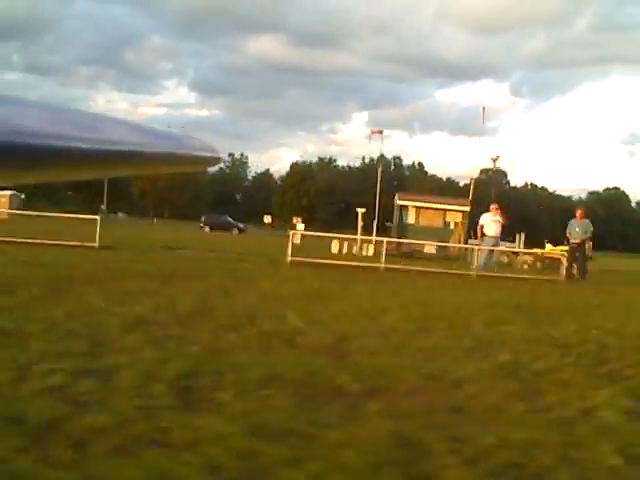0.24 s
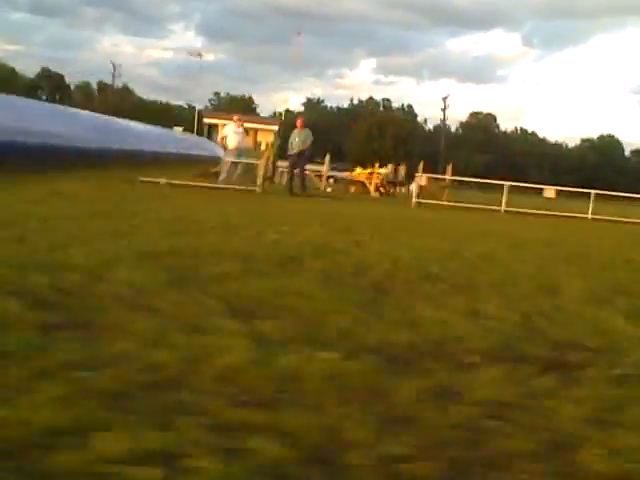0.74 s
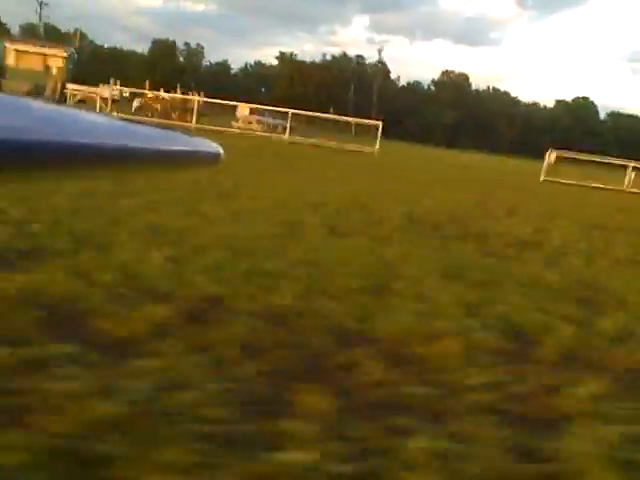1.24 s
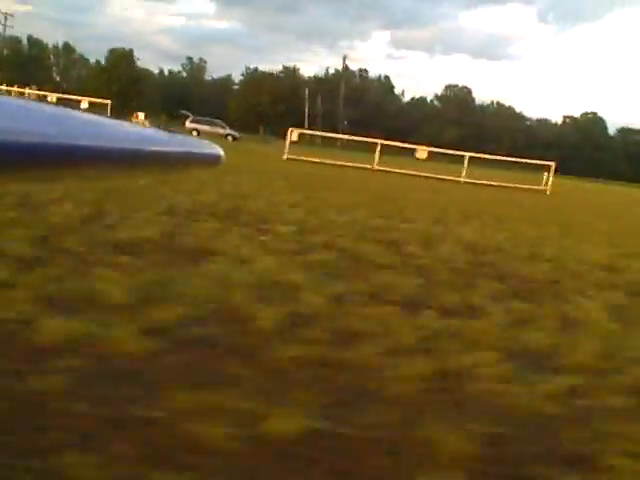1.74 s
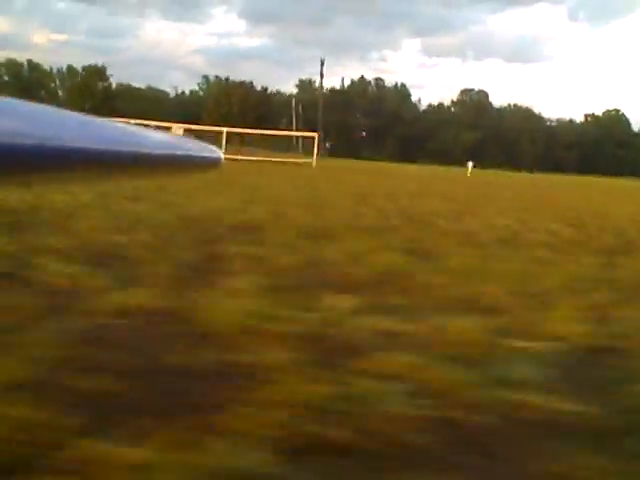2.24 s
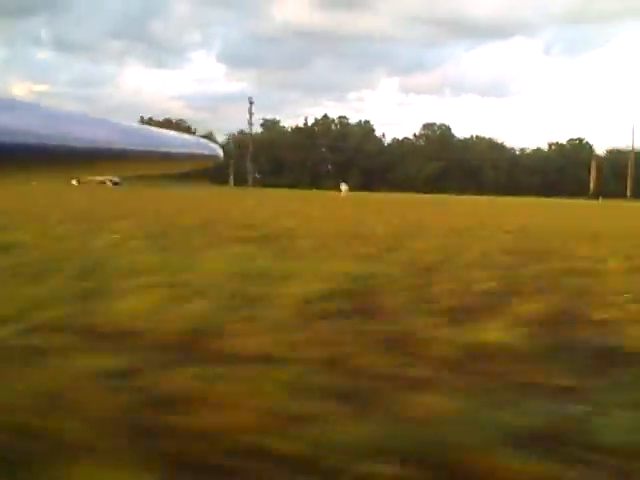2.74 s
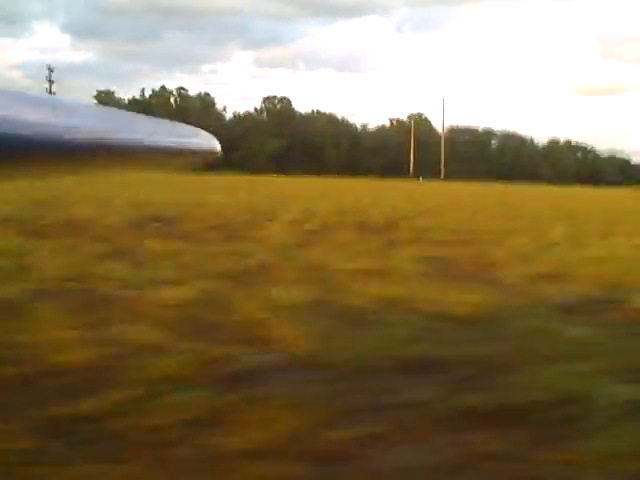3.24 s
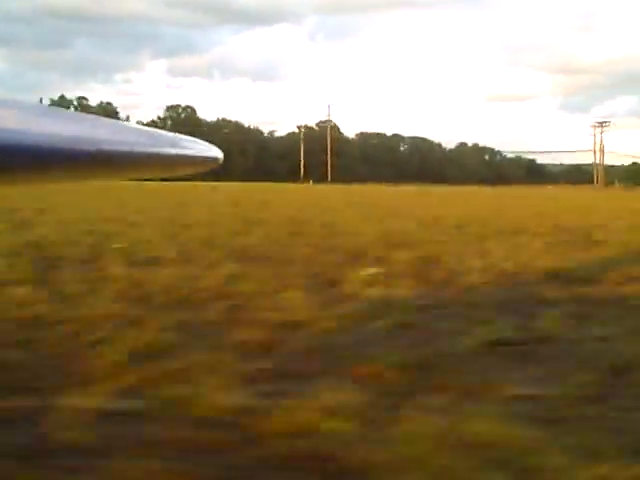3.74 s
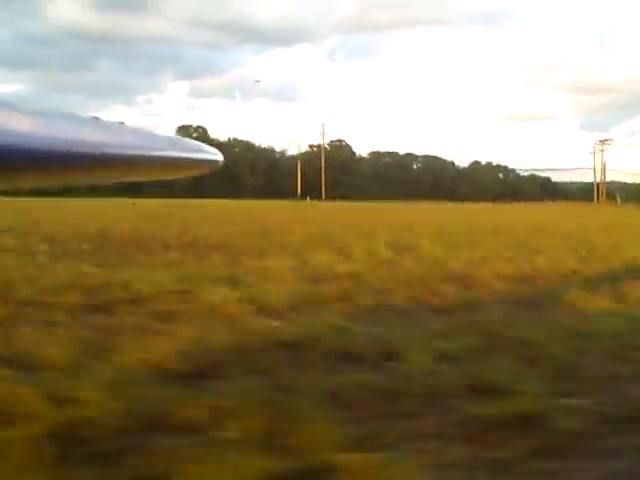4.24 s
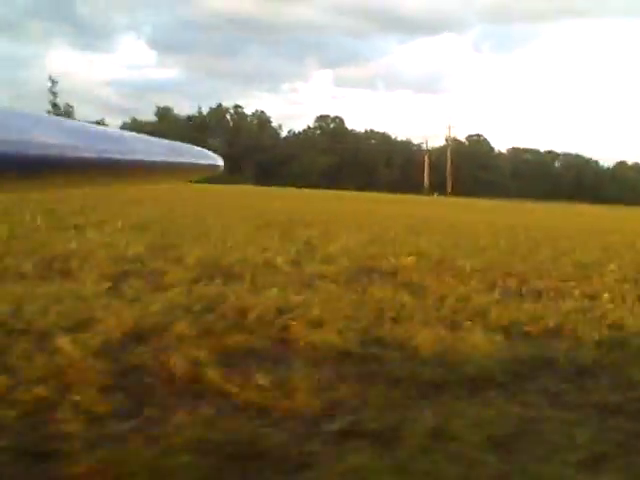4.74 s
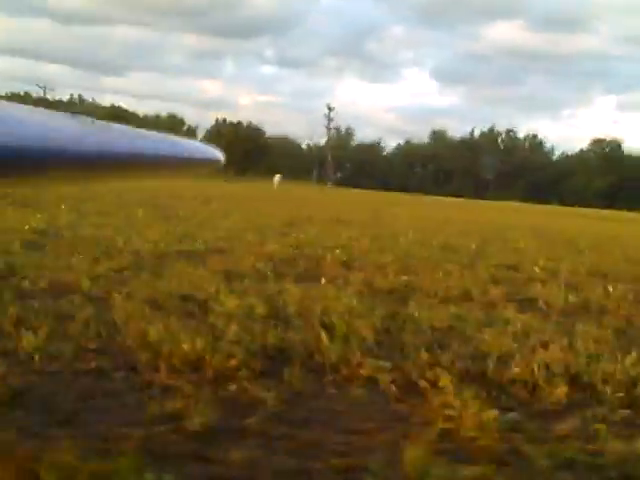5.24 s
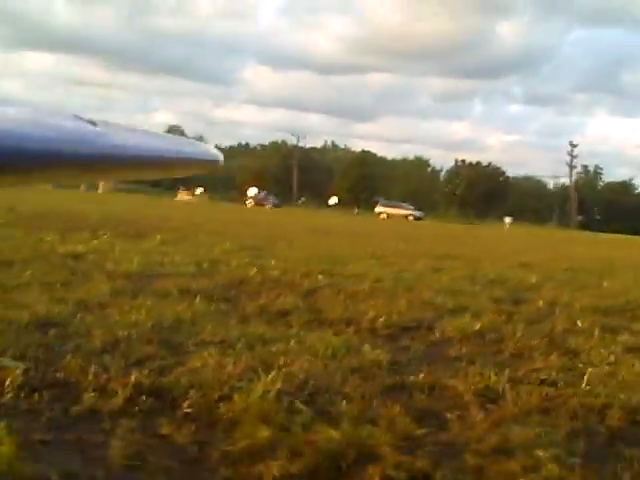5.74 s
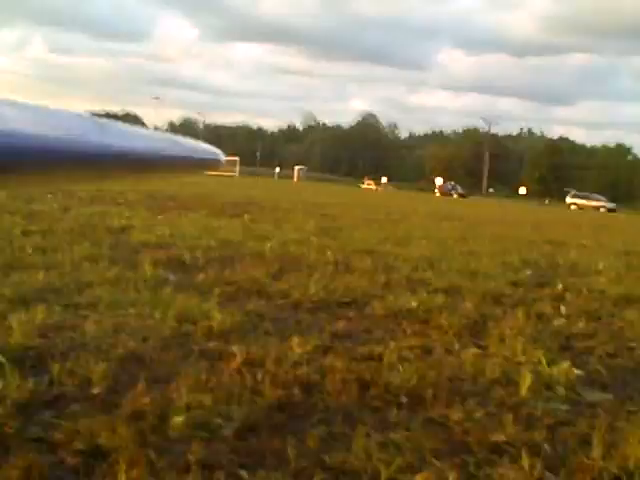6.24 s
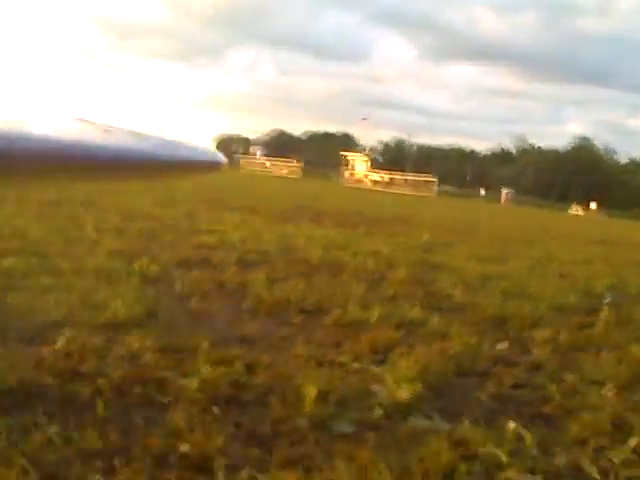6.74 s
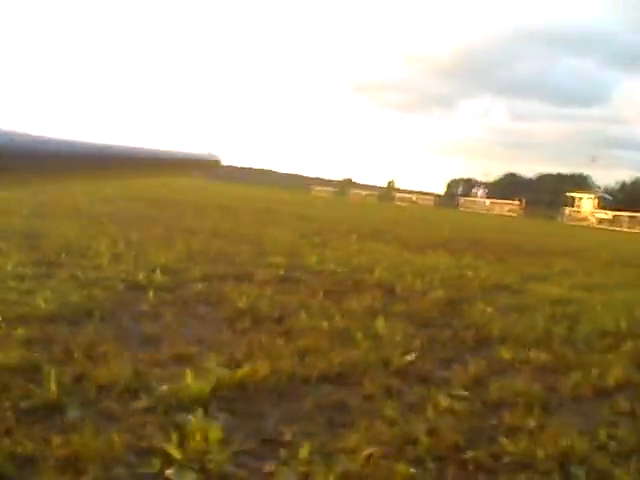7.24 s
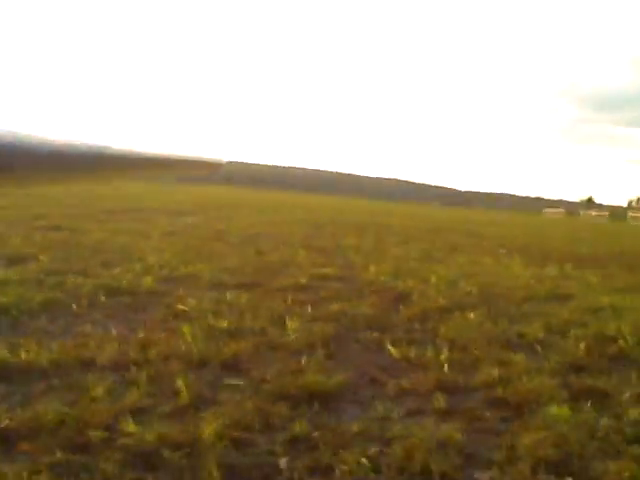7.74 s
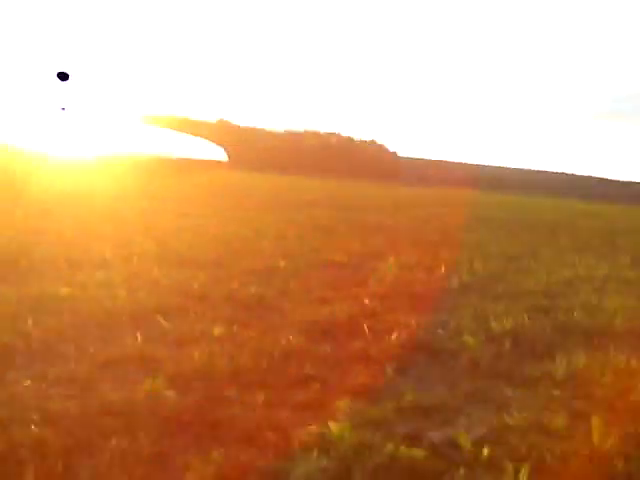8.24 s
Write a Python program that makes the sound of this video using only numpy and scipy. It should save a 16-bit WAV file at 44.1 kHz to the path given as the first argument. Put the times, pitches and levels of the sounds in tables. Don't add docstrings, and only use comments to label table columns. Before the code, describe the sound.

Heard from a tiny recorder strapped to a model plane, a motor idles with rapid metallic ticking and panel rattle while air buffets, slaps and hisses at the microphone. The idle sags and quietens slightly, then the throttle opens: a heavy propeller drone surges, climbs in pitch and lopes over bumps, with brief panel buzz and harsh overloaded distortion to the end.

```python
import sys
import numpy as np
from scipy import signal
from scipy.fft import rfft, irfft, next_fast_len
from scipy.io import wavfile
from scipy.ndimage import uniform_filter1d, map_coordinates

SR = 44100
rng = np.random.default_rng(int(sys.argv[2]) if len(sys.argv) > 2 else 0)


def boost(x):
    u = np.asarray(x, float) / 20
    return 10 ** u


def store_wav(level_fs):
    pcm = np.round(np.clip(np.atleast_2d(level_fs), -1, 1) * 32767)
    wavfile.write(sys.argv[1], SR, pcm.T.astype(np.int16))


N = 373968

# time in seconds, speed in turns a second.
SPEED = [(0.1, 66.0), (1.32, 66.1), (1.52, 63.9), (2.24, 64.1), (3.38, 60.0), (3.57, 57.6), (4.46, 55.2),
         (4.68, 55.3), (4.7, 64.4), (4.94, 77.5), (5.1, 70.4), (5.31, 84.5), (6.2, 109.5), (6.48, 122.5),
         (7.19, 128.8), (7.8, 130.7), (8.15, 137), (8.48, 134)]
THROTTLE_S = 4.69
ROLL_S, ROLL_RISE_S, STILL_DB = 0.19, 0.25, -6


def unit(x):
    return x / np.sqrt(np.mean(x ** 2) + 1e-20)


def steady(x, size):
    return x / np.sqrt(np.abs(uniform_filter1d(x ** 2, size=size)) + 1e-12)


def curves(rows):
    s, *cols = np.transpose(rows)
    return [np.interp(np.arange(N) / SR, s, c) for c in cols]


def swells(rows):
    s, half, *cols = np.transpose(rows)
    t = np.arange(0, N, 64)[:, None] / SR
    bell = np.exp(-((t - s) / half) ** 2)
    return [np.repeat(bell @ c, 64)[:N] for c in cols]


def wobble(rate):
    knots = rng.standard_normal(int(N * rate / SR) + 4)
    return map_coordinates(knots, [np.arange(N) * rate / SR])


def fade(start, length):
    return np.clip((np.arange(N) / SR - start) / length, 0, 1)


def turning(hz, unevenness, rate):
    return 2 * np.pi * np.cumsum(hz * (1 + unevenness * wobble(rate))) / SR


def filtered(x, response):
    m = next_fast_len(N + 8192)
    return irfft(rfft(x, m) * response(np.fft.rfftfreq(m, 1 / SR)), m)[:N]


def coloured(x, points):
    f, db = np.transpose(points)
    return filtered(x, lambda hz: boost(np.interp(np.log(hz + 1), np.log(f + 1), db)))


def coloured_noise(strength, points):
    return unit(coloured(strength * rng.standard_normal(N), points))


def resonant(x, modes):
    def response(f):
        total = 0
        for k, (centre, width, db) in enumerate(modes):
            damping = 1j * f * width
            total = total + (-1) ** k * boost(db) * damping / (centre * centre - f * f + damping)
        return total
    return filtered(x, response)


def knocks(hz, scatter_s, scatter_db):
    at = np.flatnonzero(np.diff(np.floor(np.cumsum(hz) / SR)))
    chance = rng.standard_normal((1000, 2))[:len(at)]
    late = np.round(scatter_s * SR * chance[:, 0]).astype(int)
    when = np.clip(at + late, 0, N - 1)
    return np.bincount(when, boost(scatter_db * chance[:, 1]), N)


def idle():
    # time in seconds, shake in dB, blade load in dB.
    idling = [(0.05, -37.5, -34), (0.6, -30, -16.5), (1.1, -31.5, -13.5), (2.2, -33, -16.5),
              (3.0, -35.5, -18.5), (3.15, -34, -10), (3.6, -35, -12), (4.2, -45.5, -27.5),
              (4.65, -38, -34.5)]
    # pitch in Hz, width in Hz, level in dB.
    frame_modes = [(1294, 140, -3.5), (1390, 88, -2.5), (1742, 51, -5.5), (2230, 140, -13),
                   (2650, 430, -18), (3490, 130, -11)]
    # pitch in Hz, width in Hz, level in dB.
    cowl_modes = [(6255, 230, 0)]
    # pitch in Hz, width in Hz, level in dB.
    snap_modes = [(5520, 1800, 3), (7150, 430, -2.5)]
    hz, = curves(SPEED)
    cowl_db, hum_db = curves(idling)
    frame_db = -36.5 + 0.15 * np.minimum(cowl_db + 35, 0)
    frame_db = frame_db + STILL_DB * (1 - fade(ROLL_S, ROLL_RISE_S))
    turn = turning(hz, 0.0065, rate=25)
    blows = knocks(hz, scatter_s=0.0003, scatter_db=1.2)

    def tremble(hz):
        dying = filtered(blows, lambda f: 1 / (1 + 1j * f / hz))
        return unit(dying * rng.standard_normal(N))

    frame = unit(resonant(unit(blows) + 0.4 * tremble(hz=35), frame_modes))
    cowl = resonant(unit(blows) + 0.3 * tremble(hz=40), cowl_modes)
    cowl = unit(resonant(cowl, cowl_modes))
    snap = unit(resonant(unit(blows) + 1.8 * tremble(hz=200), snap_modes))
    hum = boost(2.2 * wobble(10)) * np.sin(2 * turn + 0.6 * wobble(14))
    hum = hum + boost(-9.5 + 2.6 * wobble(7)) * np.sin(turn + 1)
    rattle = boost(cowl_db + 0.5) * (cowl + boost(-4.5) * snap)
    motor = boost(frame_db) * frame + rattle + boost(hum_db + 0.5) * hum
    return motor * (1 - fade(THROTTLE_S, 0.04))


def wash(drone):
    # time in seconds, push on the port in dB, draught across its slit in dB.
    stream = [(0.05, -28, -46), (0.3, -27.5, -42.5), (0.5, -23, -37), (1.2, -20.5, -34.5),
              (1.7, -21.5, -39), (2.15, -23, -36), (2.45, -29.5, -39.5), (2.95, -30, -35.5),
              (3.3, -27, -39), (3.75, -29, -32.5), (4.3, -37.5, -33.5), (4.68, -32, -38.5),
              (4.86, -23.5, -37), (5.15, -21, -38), (5.6, -22.5, -39), (6.1, -17.5, -33.5),
              (6.9, -17.5, -30), (8.4, -14, -29.5)]
    # time in seconds, half length in seconds, push in dB, draught in dB.
    gusts = [(.35, .02, -4.5, 2.5), (.7, 0.066, 1, 1.5), (1.66, .03, 0.5, 0), (1.82, 0.05, -2, 1),
             (2.14, 0.035, 1, 3.5), (2.97, 0.057, -1.5, 4.5), (3.09, 0.034, 3.5, -1), (3.33, 0.074, 1, 8),
             (3.6, .06, 1.5, -8), (3.72, 0.031, 2, 6), (4.01, 0.032, -2, -5.5), (4.18, 0.017, 6, -5),
             (4.9, 0.034, 3, 3.5), (4.98, 0.013, -2, 10.5), (5.05, 0.041, -8, -1.5),
             (5.42, 0.041, 4.5, 2.5), (5.55, 0.041, -3, -4), (6.33, 0.035, 1.5, 3), (6.43, 0.035, -0.5, 1),
             (6.56, 0.023, -3, 2.5), (6.72, 0.035, -4, 1.5), (6.85, 0.033, 4, 3.5), (6.97, 0.049, 2, -0.5),
             (7.22, 0.024, -1, -2), (7.38, .03, -0.5, 2.5), (7.59, .04, -2, -0.5), (8.0, .03, -4, -4.5),
             (8.1, 0.026, 3, 0), (8.24, 0.026, -4.5, -7.5), (8.37, 0.028, 1, 2)]
    # frequency in Hz, dB per Hz.
    buffet_colour = [(10, -8), (30, 0.5), (60, -1.5), (110, -3), (200, -12.5), (350, -32), (700, -48.5)]
    flutter_colour = [(60, -24), (200, 0.5), (400, -9.5), (800, -18), (1600, -27), (3000, -37.5),
                      (5000, -37)]
    hiss_colour = [(1500, -17), (3000, -17), (4500, -13.5), (5700, -4), (6800, 1), (8000, -2.5), (8800, 15),
                   (9500, -69.5)]
    roar_colour = [(600, 2), (1200, -5.5), (2200, -10), (3200, -12), (4500, -7), (6000, -4.5),
                   (8500, -30.5)]
    flutter_db, hiss_db = np.add(curves(stream), swells(gusts))
    push_db = flutter_db + 25
    buffet_db = -10.5 + 0.55 * push_db + 1.7 * wobble(12)
    buffet_db = buffet_db - 4.5 * fade(THROTTLE_S, 0.042)
    flutter_db = flutter_db + 1.37 * wobble(14)
    hiss_db = hiss_db + 1.1 * wobble(19)
    roar_db = -38 + 0.41 * push_db + 0.15 * (hiss_db + 38)
    roar_db = roar_db + STILL_DB * (0.5 - fade(ROLL_S, ROLL_RISE_S))

    fall = -np.gradient(drone) * SR / 400
    eddies = boost(0.6 * wobble(45) + 2.17 * wobble(140)) * np.exp(0.48 * np.tanh(fall))
    eddies = steady(eddies, size=2000)
    buffet = boost(buffet_db) * steady(coloured(rng.standard_normal(N), buffet_colour), size=9000)
    flutter = boost(flutter_db + 1.5) * coloured_noise(eddies, flutter_colour)

    slow_flutter = coloured(flutter, [(600, 2.0), (1200, -39.5)])
    slope = np.gradient(buffet + drone + slow_flutter)
    swing = np.abs(slope) - 0.3 * slope
    spurts = eddies * boost(0.51 * wobble(70) + 2.16 * wobble(400))
    spurts = spurts * (1 + steady(swing, size=8000))
    spurts = steady(spurts * np.exp(0.33 * np.tanh(fall)), size=1800)
    hiss = boost(hiss_db + 9) * coloured_noise(spurts, hiss_colour)
    roar = boost(roar_db) * coloured_noise(spurts, roar_colour)
    return buffet + flutter + hiss + roar


def slaps():
    # time in seconds, size in dB.
    bursts = [(.221, -3), (.626, 0.5), (.71, 0), (.936, -3), (1.09, -2.5), (1.349, 0), (1.43, -3),
              (1.559, 0), (1.595, 1), (1.658, 0), (1.684, 0), (1.792, 0), (1.934, -0.5), (1.974, -2),
              (2.131, -1), (2.161, -2), (2.292, -2), (2.9, -3.5), (3.03, -3.5), (3.068, -4), (3.115, -2),
              (3.571, -3.5), (4.04, -5.5), (4.1, -3.5)]
    swell_s, drop_s = 0.0058, 0.0012
    s, db = np.transpose(bursts)
    t = np.arange(-1500, 1500) / SR
    shape = -np.tanh(t / drop_s) * np.exp(-(t / swell_s) ** 2 / 2)
    hits = np.bincount((s * SR).astype(int), boost(db), N)
    return signal.fftconvolve(hits, shape, "same")


def power():
    # multiple of the shaft speed, level in dB.
    partials = [(1, -1.5), (2, -20), (3, -36)]
    # time in seconds, half length in seconds, lope rise in dB.
    lopes = [(4.71, 0.12, 12), (5.08, 0.17, 5.5), (5.43, 0.029, 9), (5.83, .08, 8.5), (6.11, .05, 21),
             (6.33, 0.048, 19.5), (6.52, 0.11, 19.5), (6.77, 0.03, 10), (7.05, 0.15, 9), (7.4, 0.21, 9.5),
             (7.57, 0.029, 15.5), (8.1, 0.13, 13.5), (8.23, 0.1, 10.5), (8.42, .05, 9)]
    hz, = curves(SPEED)
    rise_db, = swells(lopes)
    drone_db = -6.5 - 0.14 * rise_db + 1.48 * wobble(12)
    lope_db = -26 + rise_db
    turn = turning(hz, 0.0093, rate=30)
    drone = 0
    for k, db in partials:
        level = (-1) ** (k + 1) * boost(db + 0.91 * k * wobble(22))
        drone = drone + level * np.sin(k * turn + 0.25 * k * wobble(15))
    lope = boost(2.4 * wobble(12)) * np.sin(turn / 2 + 0.61 * wobble(8))
    lope = lope + boost(-6.5 + 1.8 * wobble(8.7)) * np.sin(3 * turn / 2 + 0.5 * wobble(7.2))
    return (boost(drone_db + 6) * drone + boost(lope_db + 5) * lope) * fade(THROTTLE_S, 0.071)


def panels():
    # start in seconds, end in seconds, pitch in Hz, width in Hz, level in dB.
    buzzes = [
        (4.75, 5.35, 3600, 200, -44),
        (5.25, 6.25, 4600, 250, -44),
        (4.7, 5.1, 1350, 150, -43),
    ]
    turn = 2 * np.pi * np.cumsum(curves(SPEED)[0]) / SR
    shake = np.exp(3 * np.cos(turn)) * rng.standard_normal(N)
    total = 0
    for start, end, hz, width, db in buzzes:
        buzz = boost(db) * unit(resonant(shake, [(hz, width, 0)]))
        total = total + buzz * fade(start, 0.065) * (1 - fade(end - 0.1, 0.11))
    return total


def port(x):
    lag_s, slow_hz = 0.00046, 650
    slow = filtered(x, lambda hz: 1 / (1 + (hz / slow_hz) ** 4))
    lag = lag_s * SR * np.tanh(1.03 * uniform_filter1d(slow, size=60))
    return x - slow + map_coordinates(slow, [np.arange(N) - lag], mode="nearest")


def scene():
    drone = power() + slaps()
    return port(idle() + drone + panels() + wash(drone))[None]


def roll_off(x):
    return signal.sosfilt(signal.butter(12, 16000, fs=SR, output="sos"), x)


def record(dry):
    # frequency in Hz, level in dB.
    band_limit = [(20, 0), (7000, 0), (7700, -4.5), (8300, -21.5), (8900, -41.5), (9300, -69.5),
                  (12000, -100)]
    top = 0.707
    hard = np.clip(dry[0] + 0.001, -top, top)
    smooth = np.clip(coloured(hard, band_limit), -1.008 * top, 1.008 * top)
    return roll_off(smooth[None])


dry = scene()
out = record(dry)
store_wav(out)
```